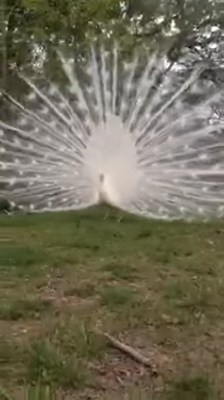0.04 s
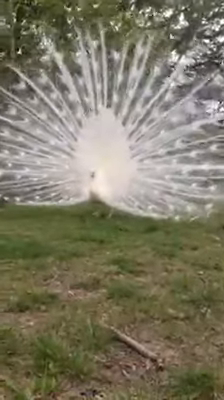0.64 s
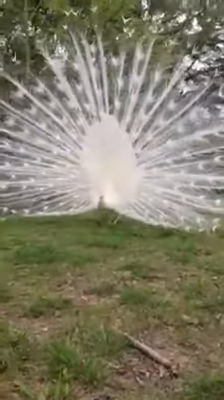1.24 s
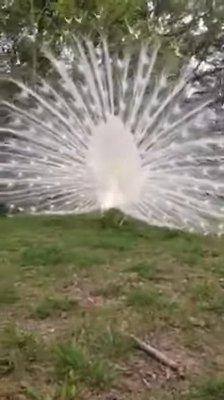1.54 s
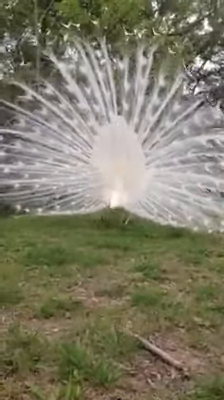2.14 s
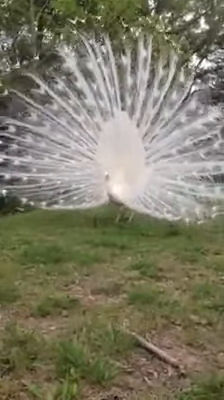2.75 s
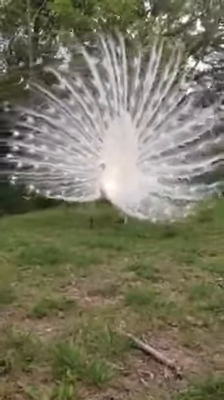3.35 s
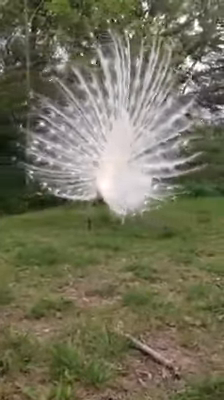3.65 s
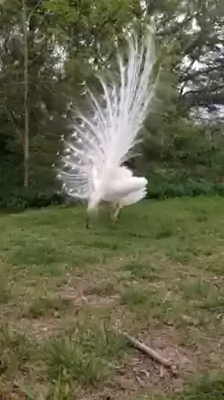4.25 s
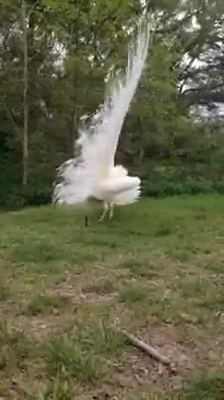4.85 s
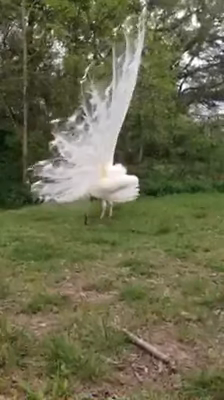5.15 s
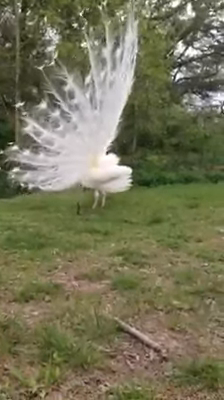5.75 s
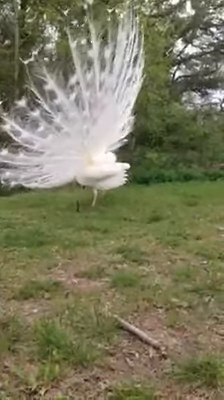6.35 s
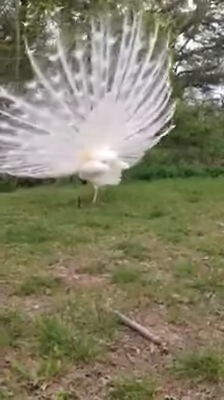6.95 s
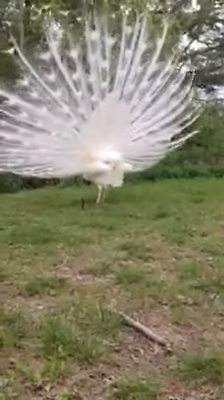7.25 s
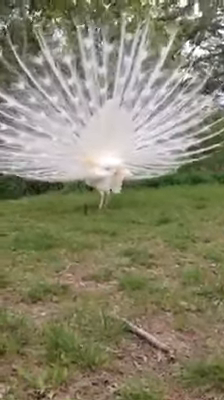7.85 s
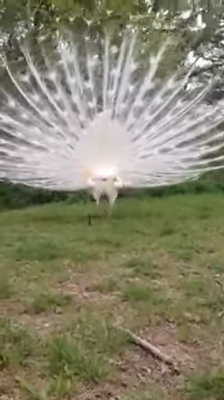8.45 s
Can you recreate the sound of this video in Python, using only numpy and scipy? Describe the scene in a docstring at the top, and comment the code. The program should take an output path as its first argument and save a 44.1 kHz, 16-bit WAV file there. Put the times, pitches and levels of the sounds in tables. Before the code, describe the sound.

A peacock gives one hoarse, whining cry that bursts into a loud honk, followed by quiet park ambience and faint bird chirps.

```python
"""A peacock calls once on a park lawn: a hoarse squeak settles into a nasal whine, then bursts into a
loud honk that sags, pinches shut and echoes from the trees. Its syrinx is a harmonic source, filtered
by the resonances of throat and beak; a slower vibration adds sidebands, and both chop the breath.
Afterwards its train rustles in faint bursts of noise and small birds chirp far off in gliding tones,
over a dim far tone and the quiet hush of distant town and leaves."""
import sys
import numpy as np
from scipy import signal
from scipy.fft import rfft, irfft
from scipy.io import wavfile

SR = 44100
rng = np.random.default_rng(int(sys.argv[2]) if len(sys.argv) > 2 else 0)


def transcribe(u):
    """Save the signal u as a 16-bit wav file named by the first command-line argument.

    u: samples, shape (n,) or (channels, n), limited to [-1, 1]; the rate is SR.
    q: integer samples, one column per channel.
    """
    v = np.clip(np.atleast_2d(u).T, -1, 1)
    q = np.round(v * 32767).astype(np.int16)
    wavfile.write(sys.argv[1], SR, q)


N = 384111

# noise spectrum of distant town and leaves: f/Hz, relative density/dB
HUSH_SPECTRUM = [(15, -44), (25, -15), (55, -0.5), (108, 0.5), (183, -1), (224, -5.5), (281, -7.5),
                 (420, -11), (830, -15), (1450, -18), (2710, -18), (3580, -15), (4490, -16), (9570, -18),
                 (10300, -20), (13400, -56.5), (22000, -120)]
# soft distant peeps: t/s, starting f/Hz, level/dB
PEEPS = [(3.139, 2430, -78), (4.029, 2380, -78), (5.118, 2600, -75), (6.3, 2540, -77), (6.38, 2540, -77),
         (7.417, 2520, -76), (7.879, 3350, -76), (8.321, 2740, -74)]
# one small bird's falling chirps and another's three-note chips: t/s, level/dB
CHIRPS = [(1.026, -63.5), (1.411, -63.5), (1.779, -64.5)]
CHIPS = [(5.749, -61.5), (7.584, -58)]
# the notes of each: delay/s, length/s, starting f/Hz, final f/Hz, bend (above 1 levels out), gain/dB
CHIRP_NOTES = [(0, .09, 5400, 3410, 1.9, 0)]
CHIP_NOTES = [(0, .038, 4150, 3080, .6, -4.5), (.036, .018, 3720, 3300, 1, -.5),
              (.055, .046, 2980, 2860, 1.5, -7)]
# rustles of quills and grass: t/s, half width/s, centre f/Hz, level/dB
RUSTLES = [(1.485, .008, 3920, -62), (1.875, 0.02, 2400, -64.5), (1.935, .4, 4000, -72),
           (2.032, 0.0062, 5930, -71), (2.291, 0.017, 8000, -68.5), (2.337, 0.014, 8000, -65)]
# frequency response of the echoes from the trees: f/Hz, gain/dB
TREE_RESPONSE = [(300, -6), (780, -2), (1560, -2.5), (2400, -1), (4000, -7.5), (7000, -9), (10000, -16)]

# pitch of the syrinx from the whine onwards: t/s, f/Hz
PITCH = [(0.195, 773.5), (0.24, 761.0), (0.3, 755.9), (0.37, 765.9), (0.44, 781.7), (0.495, 790.6),
         (0.511, 795.0), (0.53, 785.1), (0.556, 778.1), (0.62, 785.9), (0.668, 783.9), (0.69, 777.0),
         (0.712, 746.7), (0.729, 725.2), (0.753, 726.7), (0.77, 743.3)]
# cracks between registers: t/s, half width/s, relative pitch jitter, rasp level/dB
REGISTER_BREAKS = [(.166, .018, .025, -55), (.507, .01, .015, -58), (.726, .014, .012, -53.5)]
# filters for the breath, hoarse and broad: f/Hz, relative gain/dB
HOARSE_RESPONSE = [(100, -38.5), (300, -27), (1100, -27.5), (1800, -17), (2200, -17), (2500, -10),
                   (3100, -9), (3700, -6.5), (4500, -6.5), (5700, -18), (6900, -17.5), (8100, -12.5),
                   (9200, -17.5), (10300, -30)]
RASP_RESPONSE = [(60, -29.5), (170, -6.5), (300, -6.5), (600, -12), (1000, -2), (1800, -4), (3000, -0.5),
                 (4400, -5), (5600, 2.5), (7200, -3), (9000, -3), (10400, -19.5)]
# resonances of throat and beak: centre f/Hz, bandwidth/Hz, gain/dB
SQUEAK_FORMANTS = [(3200, 250, -0.99), (3400, 195, -1), (3620, 160, -1), (4160, 220, -1)]   # throat tight
WHINE_FORMANTS = [(1508, 62, -2.5), (2275, 260, -3.5), (3140, 217.5, -2), (3808, 260, -8),
                  (4572, 180, -8.5), (5420, 150, -8.5), (6100, 180, -6.5), (7500, 400, -21),
                  (9200, 910, -26)]   # beak half closed
BURST_FORMANTS = [(3180, 150, -7), (3970, 180, 1), (5550, 160, -3), (6340, 200, 0), (8700, 500, -12)]   # beak bursting open
PINCH_FORMANTS = [(2180, 330, -6.5), (3570, 233, -4.5), (5420, 160, -6), (5930, 260, 0), (6800, 261, -14),
                  (8550, 770, -12)]   # throat closing
# line spectrum of the honk, sounded from the third harmonic up: harmonic number, gain/dB
HONK_HARMONICS = [(1, -22), (2, 5), (3, -28.5), (4, -33.5), (5, -23.5), (6, -38), (7, -36.5), (8, -29.5),
                  (9, -24.5), (10, -24), (11, -29), (12, -39), (13, -40)]

# parts of the call: start t/s, hold/s, level/dB, rise/dB, arch/dB, attack/s, release/s
SQUEAK = (0, .172, -50, -1, -2, .005, .014)   # tight, broken overtones
HOARSE = (0, .182, -46, 1.5, -7.5, .005, .014)   # air through the tight throat
CATCH = (.096, .033, -46.5, 1, 0, .011, .008)   # the fundamental catches for a moment
RASP = (.18, .322, -52, 4.5, -.5, .016, .004)   # broad rush of air
HUM = (.182, .31, -41, 9, -5, .014, .01)   # fundamental of the whine
WHINE = (.197, .305, -41.5, 3, -4.5, .007, .012)   # its nasal overtones
GROWL = (.365, .14, -9.5, -2, 1, .022, .008)   # the slower vibration; level is modulation depth
CHEST = (.5, .266, -37, -6, 3, .025, .004)   # fundamental of the honk
BURST = (.501, .024, -36, 0, 1, .006, .008)   # the beak bursts open
RING = (.52, .19, -14.2, 1, 3.8, .01, .015)   # second harmonic of the honk
EDGE = (.521, .163, -11.4, -1.5, -.7, .008, .017)   # its brassy overtones
PINCH = (.7, .06, -42, -6, 0, .008, .004)   # the throat closes

TIME = np.arange(N) / SR


def from_db(db):
    """Amplitude ratio: a factor of ten for every 20 dB."""
    return 10 ** (np.asarray(db) / 20)


def unit_power(x):
    """Normalisation to a mean square of one."""
    return x / np.sqrt(np.mean(x ** 2) + 1e-20)


def phase_of(hz):
    """Phase is the time integral of frequency."""
    return 2 * np.pi * np.cumsum(hz) / SR


def colour(x, response):
    """Linear filtering: the spectrum is multiplied by a gain curve, in dB over log frequency."""
    hz, db = np.transpose(response)
    bins = np.maximum(np.fft.rfftfreq(N, 1 / SR), 1)
    return irfft(rfft(x) * from_db(np.interp(np.log(bins), np.log(hz), db)), N)


def noise(response, opening=1):
    """Source and filter: white noise is modulated, coloured and brought to unit power."""
    return unit_power(colour(opening * rng.standard_normal(N), response))


def drift(rate_hz):
    """Random fluctuation: low-passed noise of unit power."""
    lowpass = signal.butter(2, rate_hz, fs=SR, output="sos")
    return unit_power(signal.sosfilt(lowpass, rng.standard_normal(N)))


def swell(s, width):
    """Gaussian pulse of height 1, down to 1/e at one width either side."""
    return np.exp(-((TIME - s) / width) ** 2)


def gate(part):
    """Exponential attack and release around a hold of height 1."""
    start, hold, _, _, _, attack, release = part
    t = TIME - start
    decay = np.maximum(-t, 0) / attack + np.maximum(t - hold, 0) / release
    return np.exp(-np.minimum(decay, 20))


def envelope(part):
    """Amplitude envelope: a gate whose level tilts and arches over the hold."""
    start, hold, db, rise_db, arch_db, _, _ = part
    along = np.clip((TIME - start) / hold, 0, 1) - .5
    return gate(part) * from_db(db + rise_db * along + arch_db * (1 - (2 * along) ** 2))


def hush(level_db=-66.7, lull_db=-3, uneven_db=2.5):
    """Broadband noise of town and leaves: an even hiss over a rumble that wavers and briefly eases."""
    air = from_db(level_db) * noise(HUSH_SPECTRUM)
    rumble = colour(air, [(150, -0.5), (300, -21), (600, -60.5)])
    return air - rumble + rumble * from_db(lull_db * swell(.8, .55) + uneven_db * drift(9.9))


def far_tone(hz=817, db=-80):
    """A sinusoid under a Gaussian envelope swells out of the hush and sinks back."""
    return from_db(db) * swell(3.55, .2) * np.sin(2 * np.pi * hz * TIME)


def far_chorus(db=-86):
    """Incoherent sum: birds deep in the wood merge into a wavering band of noise."""
    band = noise([(1500, -40), (2100, -4.5), (2450, -1.5), (2750, -7), (3300, -41)])
    return from_db(db) * unit_power(band * from_db(3 * drift(9)))


def trees(x, t60, build_s):
    """Reverberation by scattering: diffuse echoes build up, then decay exponentially."""
    t = np.arange(2 * SR) / SR
    build_up = 1 - np.exp(-(t / build_s) ** 2)
    echoes = rng.standard_normal(len(t)) * build_up * from_db(-60 * t / t60)
    return signal.fftconvolve(x, echoes / np.linalg.norm(echoes))[:N]


def whistle(top_hz=7020, sag_hz=480, db=-76.5):
    """Joint amplitude and frequency modulation: a thin note is highest where it is loudest."""
    effort = swell(7.97, .18)
    return from_db(db) * effort * np.sin(phase_of(top_hz - sag_hz * (1 - effort)))


def falling_note(s, length, start_hz, end_hz, bend, db):
    """Frequency sweep: a pure tone glides along a power law."""
    out = np.zeros(N)
    along = np.arange(int(length * SR)) / (length * SR)
    hz = end_hz + (start_hz - end_hz) * (1 - along) ** bend
    first = int(s * SR)
    out[first:first + len(along)] = from_db(db) * np.sqrt(np.sin(np.pi * along)) * np.sin(phase_of(hz))
    return out


def song(calls, notes):
    """Superposition of sweeps: the same figure of notes at every call."""
    return sum(falling_note(s + delay, *glide, db + note_db)
               for s, db in calls for delay, *glide, note_db in notes)


def small_birds(peep_s=.048, peep_fall=.045, burr_depth=.4):
    """Gliding tones flutter in amplitude and are blurred by scattering in the foliage."""
    peeps = sum(falling_note(s, peep_s, hz, hz * (1 - peep_fall), 2, db) for s, hz, db in PEEPS)
    notes = song(CHIRPS, CHIRP_NOTES) + peeps + whistle()
    chips = song(CHIPS, CHIP_NOTES) * (1 + burr_depth * drift(250))
    direct = (notes + chips) * from_db(2.5 * drift(70))
    scattered = from_db(-2) * notes + from_db(-5.5) * chips
    return direct + trees(scattered, t60=.45, build_s=.004)


def rustles():
    """Friction noise of quills and grass: each swish has one broad spectral peak."""
    return sum(from_db(db) * swell(s, width) * noise([(hz / 8, -14), (hz, 0), (hz * 4, -12)])
               for s, width, hz, db in RUSTLES)


def breath(phase, growl_wave, pulsing=.68, ragged_db=1.07):
    """Modulated turbulence: both vibrations chop the air before the throat colours it."""
    opening = np.maximum(1 + pulsing * np.sin(phase) + 2 * growl_wave, 0)
    opening *= from_db(ragged_db * drift(120))
    rush = envelope(RASP) + sum(from_db(db) * swell(s, width) for s, width, _, db in REGISTER_BREAKS)
    return envelope(HOARSE) * noise(HOARSE_RESPONSE, opening) + rush * noise(RASP_RESPONSE, opening)


def growl(hz=291, jitter=.018, pinch_depth=.22):
    """Biphonation: a second, slower vibration joins late in the whine and in the pinch."""
    depth = envelope(GROWL) + pinch_depth * gate(PINCH)
    return depth * np.sin(phase_of(hz * (1 + jitter * drift(80))))


def syrinx(squeak_hz=932, slide_bend=1.35):
    """Fundamental frequency of the source and its relative jitter, which flares at register breaks."""
    times, hz = np.transpose(PITCH)
    slide = 1 - np.minimum(TIME / times[0], 1) ** slide_bend   # ever faster, down onto the whine
    pitch = np.interp(TIME, times, hz) + (squeak_hz - hz[0]) * slide
    jitter = .0005 + .014 * gate(SQUEAK) + .0025 * gate(WHINE) + .003 * gate(PINCH)
    return pitch, jitter + sum(share * swell(s, width) for s, width, share, _ in REGISTER_BREAKS)


def throat(phase, pitch, formants):
    """Resonance: harmonics 2 to 13 swell as they slide through the formants."""
    out = np.zeros(N)
    for k in range(2, 14):
        gain = sum(from_db(db) / (1 + (2 * (k * pitch - hz) / width) ** 2) for hz, width, db in formants)
        out += np.sqrt(2) * gain * np.sin(k * phase)
    return out


def brassy_edge(phase, flutter_db=1.2):
    """Harmonic series of the honk from the third up, each partial fluttering independently."""
    out = np.zeros(N)
    for k, db in HONK_HARMONICS[2:]:
        gain = from_db(db + flutter_db * drift(17.91))
        out += np.sqrt(2) * gain * np.sin(k * phase + rng.uniform(0, 2 * np.pi))
    return out


def peacock(shimmer=.013, crack=6.7, coupling=.22, broken_db=3.5, waver_db=1.5, growl_tone_db=-52):
    """Source-filter voice: one oscillation drives squeak, whine and honk through changing formants."""
    pitch, jitter = syrinx()
    phase = phase_of(pitch * (1 + jitter * drift(220)))
    voiced = np.maximum.reduce([envelope(CATCH), envelope(HUM), envelope(CHEST)])
    fundamental = np.sqrt(2) * voiced * from_db(waver_db * drift(30)) * np.sin(phase)
    # the open beak rings on the second harmonic; ring and edge crack where the membranes are unsteady
    unevenness = 1 + shimmer * drift(120) + crack * jitter * drift(350)
    ring = np.sqrt(2) * envelope(RING) * unevenness * np.cos(2 * phase)
    upper = envelope(EDGE) * unevenness * brassy_edge(phase)
    upper += envelope(WHINE) * from_db(waver_db * drift(40)) * throat(phase, pitch, WHINE_FORMANTS)
    upper += envelope(SQUEAK) * from_db(broken_db * drift(90)) * throat(phase, pitch, SQUEAK_FORMANTS)
    upper += envelope(BURST) * throat(phase, pitch, BURST_FORMANTS)
    snap = from_db(-28.5) * swell(.711, .012)   # the throat snaps tight as the honk ends
    upper += (envelope(PINCH) + snap) * throat(phase, pitch, PINCH_FORMANTS)
    growl_wave = growl()
    sidebands = growl_wave * (upper + coupling * fundamental)
    growl_tone = np.sqrt(2) * from_db(growl_tone_db) * growl_wave
    return fundamental + ring + upper + sidebands + growl_tone + breath(phase, growl_wave)


def scene():
    """Superposition of the call, its near and far echoes and the quiet sounds of the park."""
    call = peacock()
    near = from_db(-29.5) * trees(call, t60=.8, build_s=.08)
    far = from_db(-57) * trees(call, t60=3.14, build_s=.16)
    echoes = colour(near + far, TREE_RESPONSE)
    return (call + echoes + small_birds() + far_chorus() + far_tone() + rustles() + hush())[None]


def record(dry, cutoff_hz=10450):
    """Band limiting: an elliptic low-pass filter cuts the top steeply."""
    return signal.sosfilt(signal.ellip(12, .1, 70, cutoff_hz, fs=SR, output="sos"), dry)


dry = scene()
out = record(dry)
transcribe(out)
```